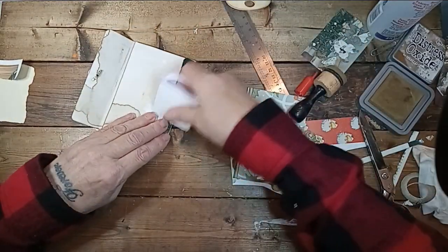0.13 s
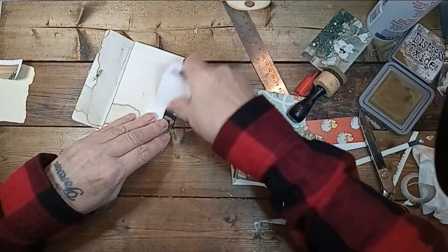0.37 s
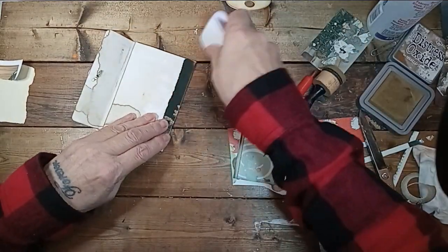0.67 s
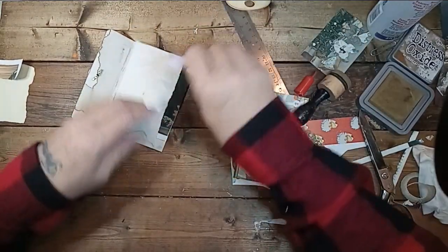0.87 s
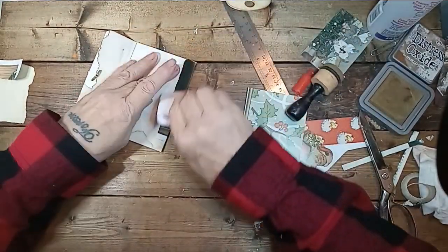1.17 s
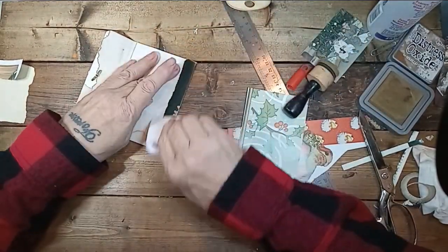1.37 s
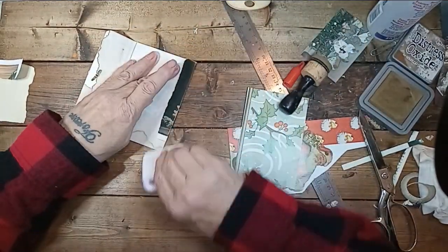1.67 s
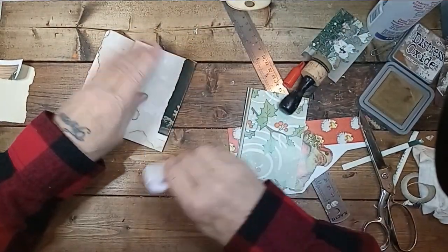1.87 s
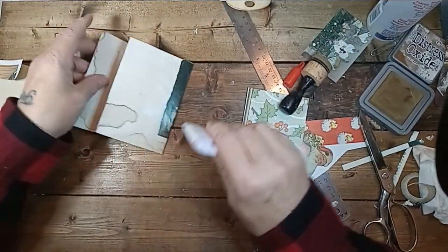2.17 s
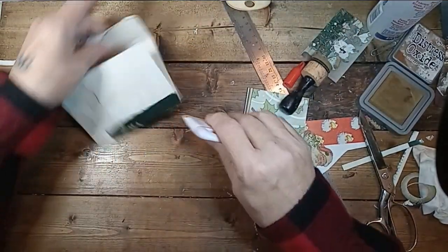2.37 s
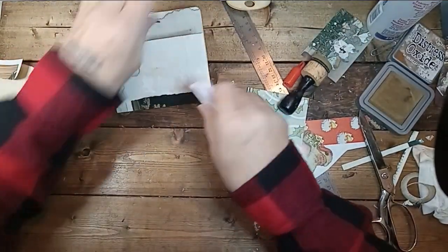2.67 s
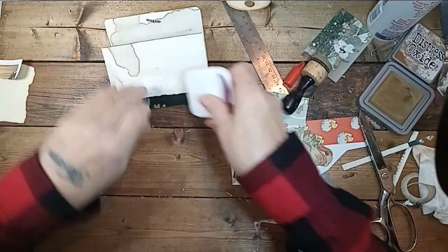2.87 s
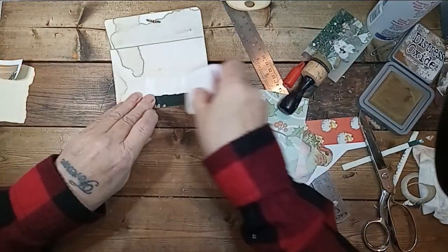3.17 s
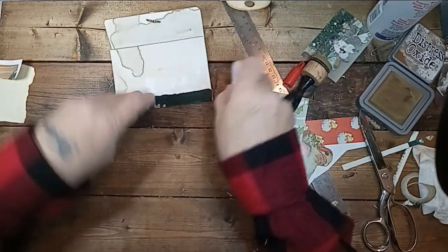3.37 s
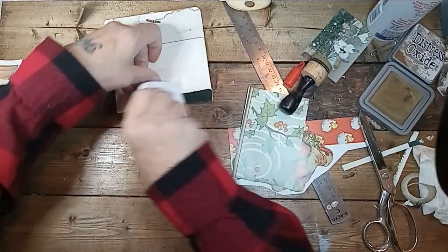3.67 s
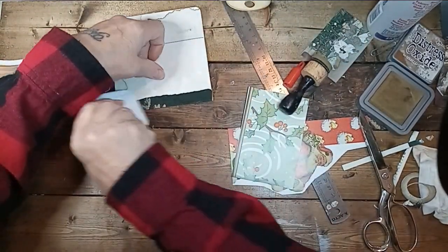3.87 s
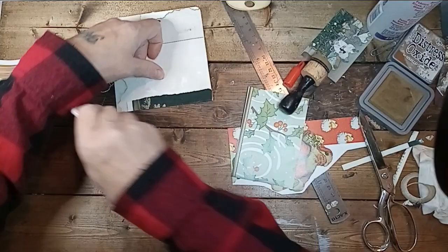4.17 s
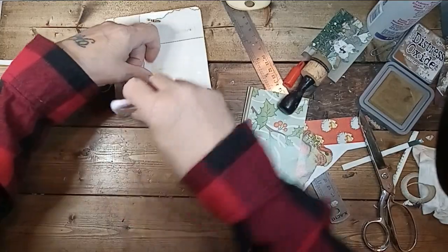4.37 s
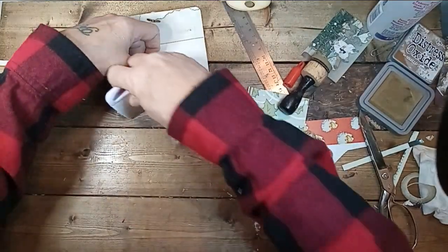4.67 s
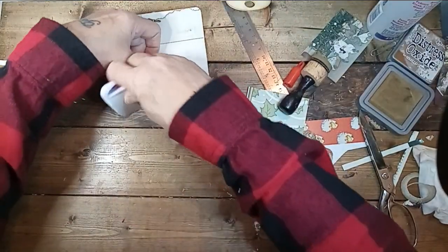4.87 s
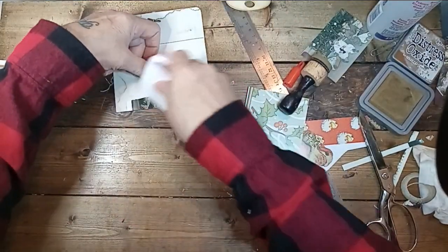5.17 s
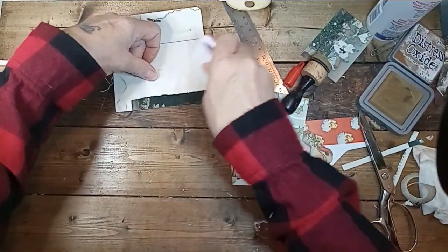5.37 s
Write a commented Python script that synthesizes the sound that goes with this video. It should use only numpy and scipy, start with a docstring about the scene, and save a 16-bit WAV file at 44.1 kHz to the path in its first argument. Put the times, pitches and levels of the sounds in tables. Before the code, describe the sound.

Close to the microphone in a small room, a pad taps a card on a wooden table and wipes it with a dry hiss. Fingers brush the paper, a tiny squeak skids, and edges flick. The card slides quietly over the boards with faint hoarse rasps, then firmer taps and wipes return, ending with a knock and swelling rub over a steady quiet hush.

```python
"""Under a steady quiet hush of filtered noise, fingers brush a folded card (grainy coloured noise), and its edges
flick (noise bursts with a brief pitch). Hands thump softly on a wooden table (low damped sines); a pad taps down
(ringing modes, slap, crack) and wipes the paper, hissing and dragging on the boards. A fingertip squeaks (narrow
noise gliding upward), the card slides over the wood and a sleeve rustles faintly; the dragged card, and later the
rubbing pad, sings hoarsely (noise around a sagging pitch). More taps, brushes and wipes follow, close to the
microphone; a small room answers with a short noise tail."""
import sys
import numpy as np
from scipy import signal
from scipy.fft import rfft, irfft, next_fast_len
from scipy.io import wavfile
from scipy.ndimage import map_coordinates

SR = 44100
rng = np.random.default_rng(int(sys.argv[2]) if len(sys.argv) > 2 else 0)


def waveform_to_disk(signal):
    """Save audio, clipped to [-1, 1], as 16-bit WAV at the path in sys.argv[1]."""
    frames = np.transpose(np.atleast_2d(signal))
    scaled = np.clip(frames, -1, 1) * 32767
    samples = np.round(scaled).astype(np.int16)
    wavfile.write(sys.argv[1], SR, samples)


N = 243873

# heavy low swing of the boards: pitch_hz [Hz], level_db [dB, before random scatter], t60_s [s]
BOARD_MODES = [(134, -4, .17), (173, -2, .15), (211, 0, .16), (245, -9, .1)]
# colour of a cracking paper edge: freq_hz [Hz], level_db [dB per Hz]
EDGE_COLOUR = [(300, -36.5), (1000, -0.5), (2500, -0.5), (6000, 0), (8000, -15.5), (9700, -9),
               (12500, -30.5), (15500, -23)]


def amp(db):
    """Decibels to gain."""
    return 10 ** (np.asarray(db) / 20)


def unit(x):
    """Scale to rms 1."""
    return x / np.sqrt(np.mean(x ** 2) + 1e-20)


def struck(x):
    """Scale a blow to rms 1 over its first fiftieth of a second."""
    return x / np.sqrt(np.mean(x[:SR // 50] ** 2) + 1e-20)


def along(points, hz):
    """Read (Hz, value) points on a log frequency axis."""
    f, v = np.transpose(points)
    return np.interp(np.log(hz + 1), np.log(f + 1), v)


def filtered(x, response):
    """Shape the spectrum of x with a response of frequency."""
    m = next_fast_len(len(x) + 8192)
    spectrum = rfft(x, m) * response(np.fft.rfftfreq(m, 1 / SR))
    return irfft(spectrum, m)[:len(x)]


def resonance(f, hz, q):
    """Causal band-pass response, gain 1 at its centre."""
    return 1j * f * hz / q / (hz * hz - f * f + 1j * f * hz / q)


def wobble(n, rate):
    """A smooth random curve, rate knots a second."""
    knots = rng.standard_normal(n // 20 + 8)
    return map_coordinates(knots, [np.arange(n) * rate / SR], mode="wrap")


def add(track, s, sound):
    """Mix a sound into the track at time s."""
    part = track[max(round(s * SR), 0):][:len(sound)]
    part += sound[:len(part)]


def ring(modes, t, scatter_db):
    """Damped modes, each at a new strength and sign for every blow."""
    out = 0
    for hz, db, t60 in modes:
        sign = rng.choice([-1, 1])
        decay = amp(db + scatter_db * rng.normal() - 60 * t / t60)
        out = out + sign * decay * np.sin(2 * np.pi * hz * t)
    return out


def burst(t, t60, tail_db, rise_s):
    """A brief crush of fibres with a faint rustle after it."""
    decay = amp(-60 * t / t60) + amp(tail_db - 60 * t / 0.12)
    return rng.standard_normal(len(t)) * decay * (1 - np.exp(-t / rise_s))


def envelope(t, rise_s, length_s, swell_db, release_db_per_s):
    """A rub gathers speed, holds with a swell or sag about its middle level, then dies away as it lifts."""
    attack = np.minimum(t / max(rise_s, 1 / SR), 1) ** 1.21
    travelled = np.minimum(t / length_s, 1)
    release_db = release_db_per_s * np.maximum(t - length_s, 0)
    return attack * amp(swell_db * (travelled - .5) - release_db)


def stick_slip(hz, width_hz):
    """Uneven stick-slip around a gliding pitch, at rms 1."""
    slips = [filtered(rng.standard_normal(len(hz)), lambda f: 1 / (1 + (f / width_hz) ** 2)) for _ in range(2)]
    phase = 2 * np.pi * np.cumsum(hz) / SR
    return unit(slips[0] * np.cos(phase) + slips[1] * np.sin(phase))


def fibres(n, snags_per_s, snag_share, rough_db):
    """Friction: countless tiny slips, a few larger snags, and a grip that chatters and flutters."""
    snags = (rng.random(n) < snags_per_s / SR) * rng.standard_normal(n)
    flutter_db = .9 * wobble(n, 40)
    chatter_db = rough_db * wobble(n, 220)
    slips = rng.standard_normal(n) + snag_share * unit(snags)
    return unit(slips * amp(chatter_db + flutter_db))


def patchy(x, depth_db):
    """The sheet's narrow resonances come and go as the grip moves over it."""
    width_hz, life_s = 140, .055  # spacing of the random field in pitch and time
    hz, t, z = signal.stft(x, SR, nperseg=512)
    place = np.meshgrid(hz / width_hz, t / life_s, indexing="ij")
    field = map_coordinates(rng.standard_normal((160, 12)), place, mode="wrap")
    blur = 1 / (1 + (hz[:, None] / 11000) ** 4)  # high resonances overlap and even out
    return signal.istft(z * amp(depth_db * blur * field), SR, nperseg=512)[1][:len(x)]


def stroke(row, colour, release_db_per_s, snags_per_s, snag_share, rough_db, patchy_db):
    """One rub: the surface hisses while the drag shakes the boards and wakes the table top."""
    # colour of the drag on the boards: freq_hz [Hz], level_db [dB per Hz]
    drag_colour = [(41, -41.5), (70, -13), (113, -0.5), (160, 6), (213, -4), (383, -19.5), (463, -11),
                   (523, 2), (650, 1), (819, -5), (938, -4.5), (1130, -8), (1350, -6), (1450, -25),
                   (1800, -15.5), (2340, -74.5), (3960, -120)]
    # table-top resonances that a drag keeps going: pitch_hz [Hz], q [ratio], gain [ratio]
    drag_modes = [(535, 22, 0.3), (693, 39, 1), (890, 27, 0.24)]
    _, rise_s, length_s, hiss_db, swell_db, drag_db, bright_db = row
    t = np.arange(SR // 2) / SR

    hiss = filtered(fibres(len(t), snags_per_s, snag_share, rough_db), lambda f: amp(along(colour, f)))
    pressure_db = 1.07 * wobble(len(t), 22)  # the hand never presses quite evenly
    hiss = unit(patchy(hiss, patchy_db) * amp(pressure_db))
    # tilt treble against middle about 4 kHz
    dull = filtered(hiss, lambda f: 1 / (1 + (f / 4000) ** 4))
    hiss = dull * amp(-bright_db / 2) + (hiss - dull) * amp(bright_db / 2)

    def wood(f):
        """Drag colour with the table-top resonances on it."""
        modes = sum(gain * resonance(f, hz, q) for hz, q, gain in drag_modes)
        return amp(along(drag_colour, f)) * (1 + modes)

    drag = unit(filtered(fibres(len(t), 270, snag_share, rough_db), wood))
    hiss_shape = envelope(t, rise_s, length_s, swell_db, release_db_per_s)
    # the drag follows the hand's weight without a swell, and the boards die away at their own rate
    drag_shape = envelope(t, rise_s, length_s, swell_db=0, release_db_per_s=387)
    return amp(hiss_db) * hiss * hiss_shape + amp(drag_db) * drag * drag_shape


def hush():
    """The steady hush of the room: coloured noise."""
    # colour of the hush: freq_hz [Hz], level_db [dB per Hz]
    hush_colour = [(25, -2), (70, 6.5), (170, 1), (330, -1), (600, -5.5), (1100, -9), (2000, -4.5),
                   (3000, -3.5), (4200, -16), (6000, -11.5), (8200, -25.5), (9600, -8), (12000, -39),
                   (15500, -25)]
    return amp(-74.5) * unit(filtered(rng.standard_normal(N), lambda f: amp(along(hush_colour, f))))


def brushes():
    """Fingers and sleeve brush the paper: patchy friction noise."""
    # brushing strokes: start_s [s], rise_s [s], length_s [s], hiss_db [dB], swell_db [dB over the length],
    # drag_db [dB, on the boards], bright_db [dB, treble over middle]
    brush_rows = [(0.107, 0.013, 0.023, -51, -2, -51.5, -2), (0.225, .008, 0.0053, -53.5, -1, -45.5, 29),
                  (0.777, 0.005, 0.086, -61, 2, -89, 4), (0.855, 0.017, 0.034, -53, 3, -79, -3.5),
                  (0.945, 0.0099, 0.1, -63, 1, -87, -5), (1.029, 0.043, 0.13, -46, -7.5, -53, 0.5),
                  (1.15, 0.025, 0.058, -41.5, -4.5, -48.5, 5.5), (1.224, .02, 0.14, -59, -2, -70, 1),
                  (1.3, 0.018, 0.017, -48.5, 2.5, -71, 18.5), (1.391, 0.035, 0.16, -76.5, -25, -75.5, -3),
                  (3.418, 0.0047, 0.0054, -49, 4, -89, -8.5), (3.512, 0.017, 0.059, -61, 12, -65.5, -11),
                  (3.586, 0.032, 0.092, -48, -7, -70, 5), (3.673, 0.029, 0.14, -50.5, -1, -64.5, 5.5),
                  (3.812, 0.012, 0.092, -64, -4, -62.5, 14), (3.905, 0.061, .085, -49, -15, -48.5, 20.5),
                  (4.217, 0.027, 0.038, -73.5, 3, -75, -12), (4.321, 0.041, 0.057, -65.5, -4, -87, 4),
                  (4.494, 0.011, 0.039, -67, 9, -71, -4), (4.601, 0.016, 0.021, -63, 8, -60, 4.5),
                  (4.765, 0.005, 0.076, -79, -6.5, -60.5, 1), (4.868, 0.0084, 0.0067, -50.5, 4, -55.5, 19),
                  (4.903, 0.016, 0.0073, -61.5, -1, -75, 4.5), (5.447, 0.015, 0.012, -64.5, 8.5, -94, 4)]
    # friction colour of the fingers: freq_hz [Hz], level_db [dB per Hz]
    finger_colour = [(590, -18.5), (1120, -45), (1400, -7.5), (1770, -14), (2080, -3), (2740, -8),
                     (3050, 3.5), (3540, -8.5), (5310, -3), (8260, -17), (12500, -29), (13600, -60),
                     (15100, -20), (16000, -43.5)]
    out = np.zeros(N)
    for row in brush_rows:
        add(out, row[0], stroke(row, finger_colour, release_db_per_s=489, snags_per_s=1100,
                                snag_share=0.23, rough_db=1.67, patchy_db=6.5))
    return out


def flicks():
    """Paper edges catch and let go, each with a brief pitch."""
    # edge flicks: start_s [s], level_db [dB], pitch_hz [Hz]
    flick_rows = [(0.1133, -50, 2730), (0.237, -56, 6400), (0.625, -49.5, 6200), (0.663, -54, 2790),
                  (0.788, -58.5, 2720), (0.828, -57.5, 8600), (1.035, -51.5, 3130), (1.2216, -52, 5300),
                  (1.313, -84, 5100), (1.5517, -52, 3100), (2.132, -69.5, 3050), (3.3743, -56.5, 2100),
                  (3.52, -62, 3100), (3.5515, -64, 2380), (4.878, -50, 6350), (5.3153, -35.5, 4100)]
    out, t = np.zeros(N), np.arange(SR // 6) / SR
    for s, db, hz in flick_rows:
        def colour(f):
            """Edge colour with a narrow pitch, under a broad band far above it."""
            pitched = 1 + 6.6 * resonance(f, hz, 24)
            return amp(along(EDGE_COLOUR, f)) * pitched * resonance(f, 12.0 * hz, 0.27)

        crush = burst(t, t60=0.01, tail_db=-28.0, rise_s=0.0033)
        add(out, s, amp(db) * struck(filtered(crush, colour)))
    return out


def thumps():
    """A soft hand wakes only the low swing of the boards."""
    # hands landing on the boards: start_s [s], level_db [dB], pitch_hz [Hz]
    thump_rows = [(0.122, -38, 133), (0.572, -31.5, 216), (0.611, -50.5, 196), (0.686, -46.5, 215),
                  (0.979, -46.5, 139), (1.002, -52, 133), (1.044, -41.5, 129), (1.236, -54.5, 142),
                  (1.336, -51, 159.7), (1.603, -51, 112.6), (1.949, -42, 93), (2.944, -55, 186),
                  (3.261, -41, 185), (3.545, -45, 126.5), (3.689, -44.5, 127), (3.97, -44, 130),
                  (4.066, -47.5, 229.5), (4.506, -58.5, 142), (4.628, -50.5, 136), (4.779, -50, 137),
                  (4.863, -51.5, 165)]
    out, t = np.zeros(N), np.arange(SR // 3) / SR
    for s, db, hz in thump_rows:
        spot = struck(np.sin(2 * np.pi * hz * t) * amp(-60 * t / .11))
        swing = spot + 0.23 * struck(ring(BOARD_MODES, t, scatter_db=-3.5))
        add(out, s, amp(db) * struck(swing * (1 - np.exp(-t / 0.0018))))
    return out


def table_knock(t, knock_hz):
    """The struck spot sounds its own pitch, sets the table top ringing and rattles the loose card on it."""
    # table-top modes: pitch_hz [Hz], level_db [dB, before drive and scatter], t60_s [s, before the cycle limit]
    top_modes = [(305, -23, 0.16), (420, -9, 0.1), (537.2, -1, 0.14), (603.3, -2.5, 0.079),
                 (641.7, 1.5, 0.11), (728, -11.5, 0.062), (750, -2, 0.059), (910, -15, 0.045),
                 (1150, -17, 0.053), (1216.5, -2, 0.18), (1660, -9.5, 0.046), (2074, -15, .08)]
    wood_cycles = 125  # the most cycles a mode takes to fall 60 dB
    spot = struck(np.sin(2 * np.pi * knock_hz * t) * amp(-60 * t / 0.055))
    driven = []
    for hz, db, t60 in top_modes:
        # modes nearest the pitch of the spot are driven hardest
        drive_db = db - 4 * abs(np.log2(hz / knock_hz))
        driven.append((hz, drive_db, min(t60, wood_cycles / hz)))
    top = struck(ring(driven, t, scatter_db=1.4))
    rattle_noise = rng.standard_normal(len(t)) * amp(-60 * t / 0.075)
    rattle = struck(filtered(rattle_noise, lambda f: resonance(f, knock_hz, 1.16) ** 2))
    return struck((1.1 * spot + top + 0.89 * rattle) * (1 - np.exp(-t / 0.00059)))


def card_slap(t, slap_hz):
    """The sheet flexes around its own pitch: a resonant noise burst."""
    def flex(f):
        """A broad band with a sharper peak at the slap pitch."""
        return resonance(f, 0.91 * slap_hz, 0.8) ** 2 * (1 + 11.0 * resonance(f, slap_hz, 7.3))

    return struck(filtered(burst(t, t60=0.017, tail_db=-20.5, rise_s=0.00036), flex))


def edge_crack(t):
    """The paper edge cracks thinly: a short bright noise burst."""
    edge = lambda f: amp(along(EDGE_COLOUR, f)) * resonance(f, 6500, 0.91) ** 2
    return struck(filtered(burst(t, t60=0.013, tail_db=-25.5, rise_s=0.0013), edge))


def taps():
    """Each blow knocks the table, slaps the card, cracks its edge and thuds in the boards."""
    # pad or card striking the table: start_s [s], knock_db [dB], knock_hz [Hz], slap_db [dB], slap_hz [Hz],
    # crack_db [dB], thud_db [dB]
    tap_rows = [(0.171, -33.5, 555, -39, 3180, -51, -42), (0.566, -36.5, 665, -34.5, 3030, -37, -68),
                (0.682, -52, 666, -50.5, 2670, -47.5, -73), (0.941, -54, 1330, -51.5, 2100, -62, -66),
                (1.653, -39.5, 794, -39, 3130, -33, -64), (2.389, -47.5, 1234, -59, 1760, -86.5, -77),
                (2.459, -50.5, 923, -54, 1550, -89, -62), (2.547, -41, 555, -41, 2213, -72.5, -46.5),
                (2.93, -58.5, 598, -60.5, 2470, -75, -62), (2.981, -34.5, 597, -43.5, 1860, -48, -42.5),
                (3.249, -29.5, 568, -48, 1560, -41, -47), (4.006, -31, 918, -35, 2910, -32.5, -73.5),
                (4.601, -47.5, 614, -77, 1600, -92, -84), (4.615, -45, 1224, -56, 2450, -65.5, -67),
                (4.664, -56.5, 1094, -86, 1610, -90, -63), (4.776, -59, 1280, -84, 1530, -93, -59),
                (4.799, -57.5, 1243, -79, 1560, -71.5, -58), (5.04, -30, 595, -38.5, 1620, -42.5, -40)]
    out, t = np.zeros(N), np.arange(SR // 3) / SR
    for s, knock_db, knock_hz, slap_db, slap_hz, crack_db, thud_db in tap_rows:
        thud = struck(ring(BOARD_MODES, t, scatter_db=4.5) * (1 - np.exp(-t / 0.0022)))
        add(out, s, amp(knock_db) * table_knock(t, knock_hz) + amp(slap_db) * card_slap(t, slap_hz)
            + amp(crack_db) * edge_crack(t) + amp(thud_db) * thud)
    return out


def pad_wipes():
    """The pad rubs along the paper: friction noise with frequent snags."""
    # wipes of the pad: start_s [s], rise_s [s], length_s [s], hiss_db [dB], swell_db [dB over the length],
    # drag_db [dB, on the boards], bright_db [dB, treble over middle]
    wipe_rows = [(0.231, 0.11, 0.25, -37.5, -8, -45, -1.5), (0.512, 0.024, 0.057, -43, 15.5, -48, 0),
                 (0.568, .003, 0.01, -31, -5.5, -41, -7), (0.585, 0.012, 0.027, -44, -2.5, -45.5, 2),
                 (1.542, 0.03, 0.072, -46, -2.5, -49, 7), (1.659, 0.03, 0.064, -44.5, -4.5, -45, 10.5),
                 (3.053, 0.034, 0.12, -38, 0, -48, 3), (3.16, 0.041, .086, -44, 4.5, -51, 4.5),
                 (3.247, 0.016, 0.038, -33.5, -9, -35.5, 2), (4.006, .01, 0.072, -46, -2.5, -41, 4.5),
                 (5.044, 0.024, .22, -44, 16, -55.5, 5), (5.245, 0.034, 0.13, -35, -3, -51.5, 8.5)]
    # friction colour of the pad: freq_hz [Hz], level_db [dB per Hz]
    pad_colour = [(590, -28), (1000, -15.5), (1340, -8), (1450, -9), (2330, -3), (2590, -3.5), (3120, -0.5),
                  (3710, -7), (3930, -5), (5310, -2.5), (8160, -15.5), (9720, -17), (13400, -40),
                  (15100, -22.5), (16000, -27.5)]
    out = np.zeros(N)
    for row in wipe_rows:
        add(out, row[0], stroke(row, pad_colour, release_db_per_s=453.5, snags_per_s=1300,
                                snag_share=0.37, rough_db=1.26, patchy_db=4.5))
    return out


def squeak():
    """A fingertip skids on the paper with a thin rising squeak of stick-slip."""
    # squeak glide points: time_s [s], pitch_hz [Hz], level_db [dB]
    glide = [(1.105, 11500, -75), (1.123, 11600, -59), (1.141, 11920, -49.5), (1.149, 14300, -49.5),
             (1.158, 15200, -73)]
    s, hz, db = np.transpose(glide)
    t = np.arange(N) / SR
    level_db = np.interp(t, s, db, left=-np.inf, right=-np.inf)
    return amp(level_db) * stick_slip(np.interp(t, s, hz), width_hz=900)


def slides_and_rustle():
    """The card slides over the wood and a sleeve rustles faintly: rougher friction noise with sparser snags."""
    # card slides and sleeve rustle: start_s [s], rise_s [s], length_s [s], hiss_db [dB],
    # swell_db [dB over the length], drag_db [dB, on the boards], bright_db [dB, treble over middle]
    slide_rows = [(1.801, 0.007, 0.14, -61.5, 1, -99, 10), (1.968, 0.015, 0.045, -43.5, -1, -47, -2.5),
                  (2.18, 0.011, 0.11, -70, -3, -89, 17.5), (2.288, 0.095, 0.11, -65, -15, -69, 1),
                  (2.379, 0.01, 0.017, -78, -3, -57.5, -14), (2.434, 0.035, 0.065, -76, 0, -67.5, 1),
                  (2.55, .015, 0.027, -69, 4, -53, 6), (2.702, 0.048, .18, -81.5, 8.5, -81, -16),
                  (2.892, 0.01, 0.15, -67, -3, -78, -4)]
    # friction colour of card and sleeve: freq_hz [Hz], level_db [dB per Hz]
    slide_colour = [(600, -29.5), (1000, -21), (1350, 2), (1700, -5.5), (2400, -1.5), (3300, -6.5),
                    (4300, -11.5), (6200, -6), (8000, -21.5), (9700, -12), (12500, -38), (15500, -29)]
    out = np.zeros(N)
    for row in slide_rows:
        add(out, row[0], stroke(row, slide_colour, release_db_per_s=564, snags_per_s=600,
                                snag_share=0.18, rough_db=3.0, patchy_db=4.5))
    return out


def rasps():
    """The dragged card, and once the rubbing pad, sings hoarsely, its stick-slip pitch sagging."""
    # hoarse singing: start_s [s], rise_s [s], length_s [s], pitch_hz [Hz, at the start], level_db [dB],
    # swell_db [dB over the length]
    rasp_rows = [(1.833, 0.067, 0.19, 2430, -53, -5), (1.973, .007, 0.03, 2424, -42.5, 8),
                 (2.188, 0.0069, 0.086, 2073, -64.5, -13), (2.485, 0.036, 0.028, 1980, -59, 4),
                 (3.065, 0.081, 0.11, 2333, -40, -11.5)]
    sag_hz_per_s, scratch_share = 650, 0.32
    out, t = np.zeros(N), np.arange(SR // 3) / SR
    for s, rise_s, length_s, hz, db, swell_db in rasp_rows:
        pitch = hz - sag_hz_per_s * t
        # ragged slips spread widely round the pitch
        scratch = stick_slip(pitch, width_hz=650)
        song = unit(stick_slip(pitch, width_hz=94) + scratch_share * scratch)
        add(out, s, amp(db) * song * envelope(t, rise_s, length_s, swell_db, release_db_per_s=548))
    return out


def room(x):
    """A short diffuse answer from the walls: a noise tail whose decay depends on frequency."""
    # decay of the room: freq_hz [Hz], t60_s [s]
    decay_times = [(150, 0.19), (700, 0.1), (4000, 0.03), (12000, 0.031)]
    hz, t, z = signal.stft(rng.standard_normal(SR // 2), SR, nperseg=256)
    decay = amp(-60 * t / along(decay_times, hz)[:, None])
    tail = signal.istft(z * decay, SR, nperseg=256)[1]
    delayed = np.pad(x, (SR // 200, 0))  # 5 ms before the walls answer
    return signal.fftconvolve(delayed, tail / np.linalg.norm(tail))[:N]


def scene():
    """The handling, its room and the steady background hush."""
    work = brushes() + flicks() + thumps() + taps() + pad_wipes() + squeak() + slides_and_rustle() + rasps()
    return (work + amp(-13.5) * room(work) + hush())[None]


def record(dry):
    """The small microphone loses the deepest bass and keeps nothing above its band limit."""
    low_cut_hz, top_hz = 22, 16100
    low_cut = lambda f: (1j * f / (1j * f + low_cut_hz)) ** 2
    return np.array([filtered(x, lambda f: low_cut(f) * (f < top_hz)) for x in dry])


dry = scene()
out = record(dry)
waveform_to_disk(out)
```